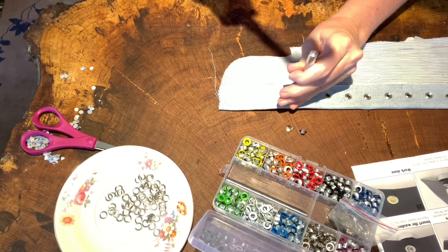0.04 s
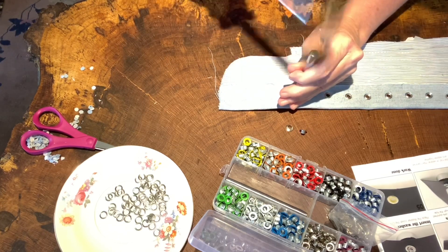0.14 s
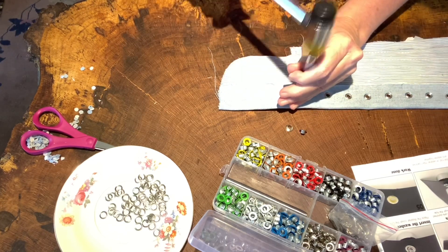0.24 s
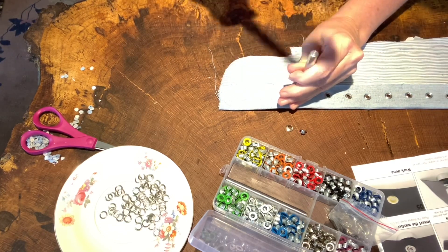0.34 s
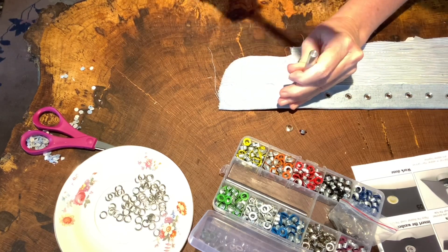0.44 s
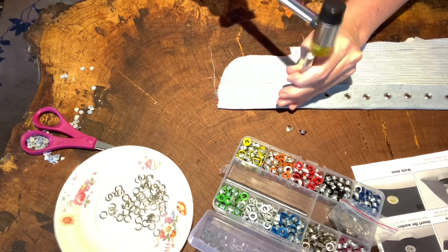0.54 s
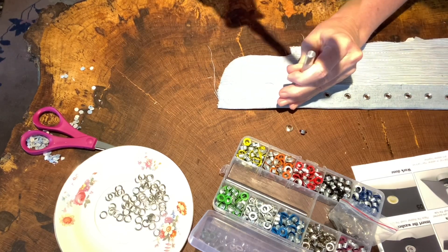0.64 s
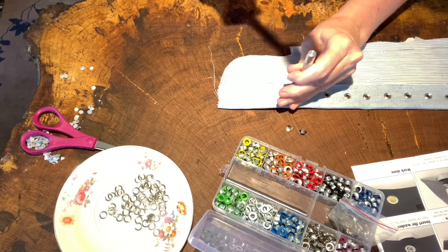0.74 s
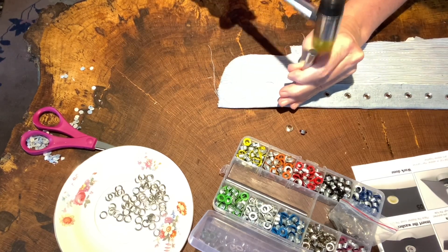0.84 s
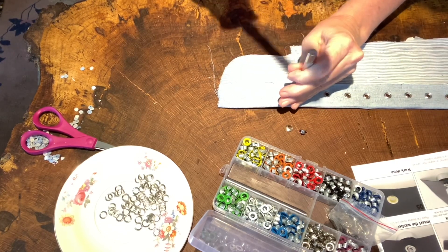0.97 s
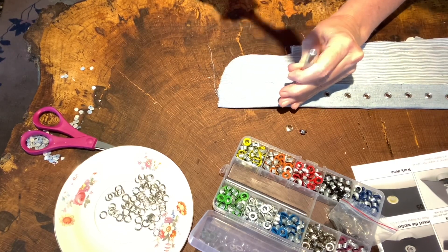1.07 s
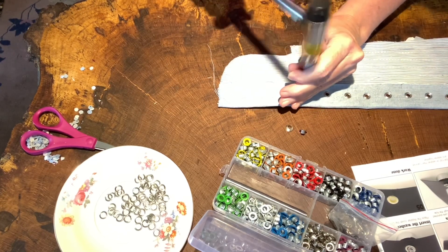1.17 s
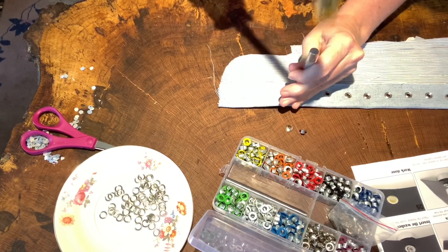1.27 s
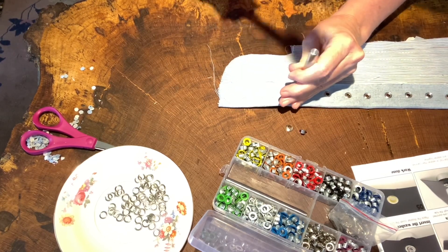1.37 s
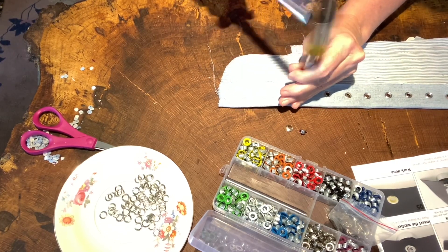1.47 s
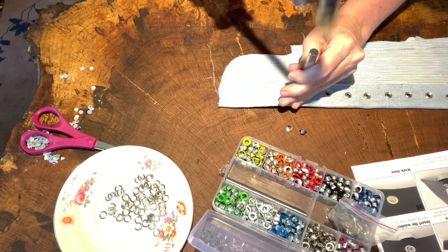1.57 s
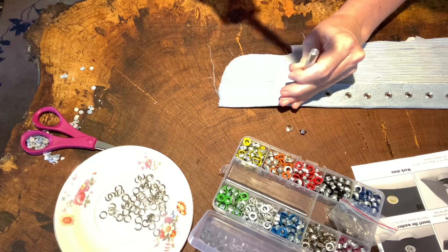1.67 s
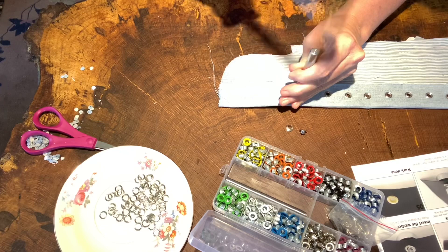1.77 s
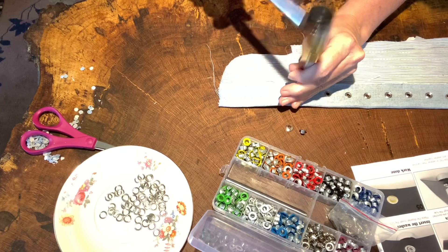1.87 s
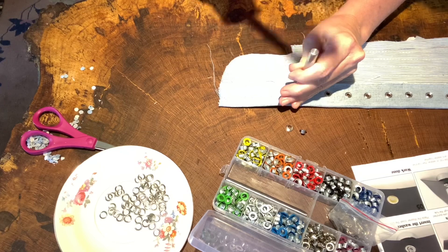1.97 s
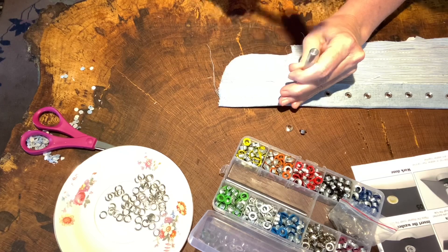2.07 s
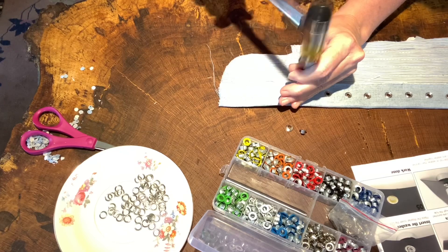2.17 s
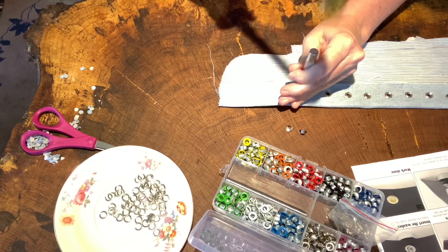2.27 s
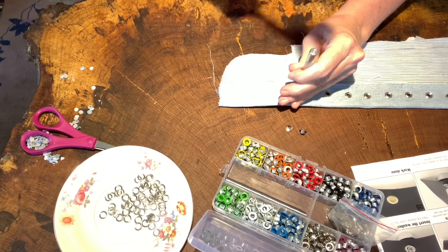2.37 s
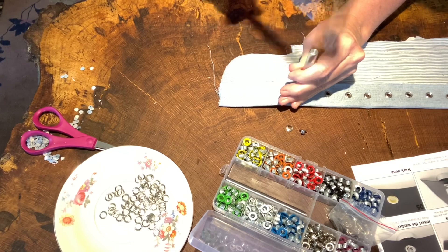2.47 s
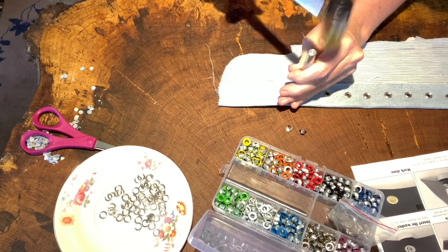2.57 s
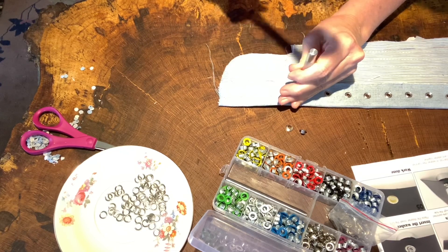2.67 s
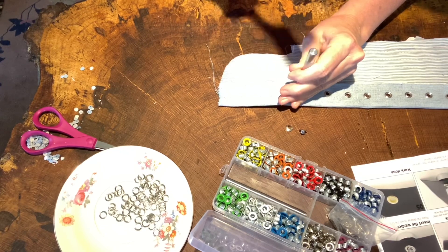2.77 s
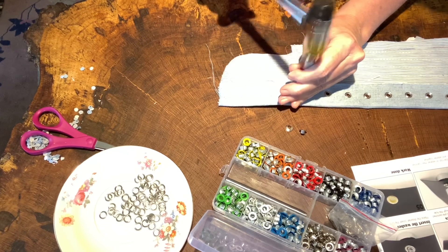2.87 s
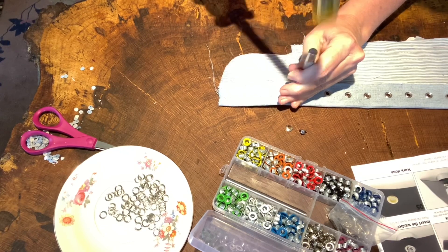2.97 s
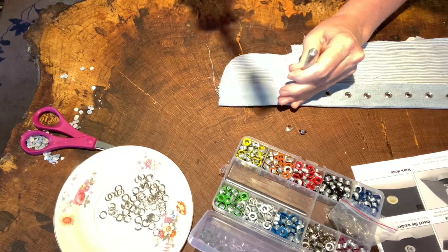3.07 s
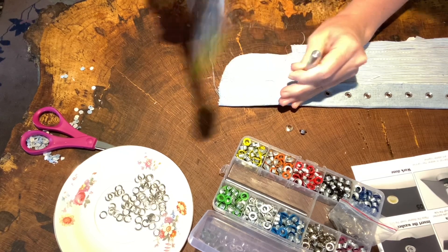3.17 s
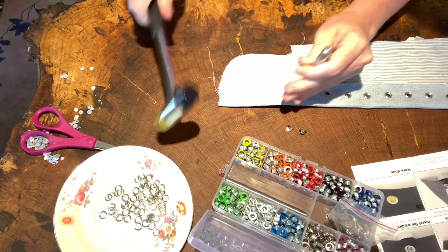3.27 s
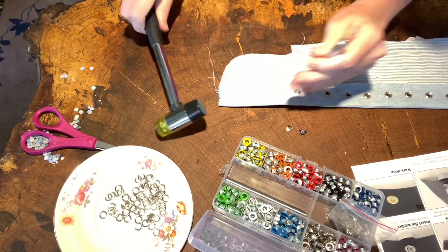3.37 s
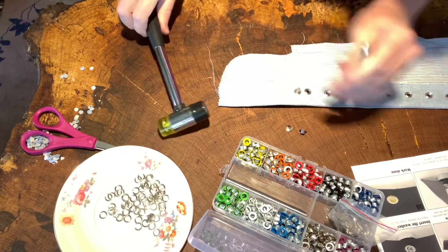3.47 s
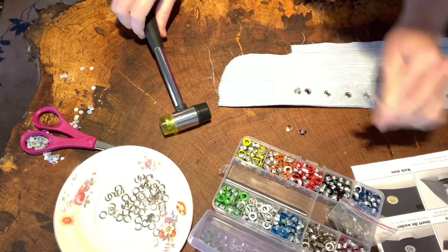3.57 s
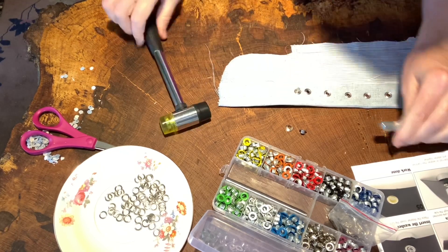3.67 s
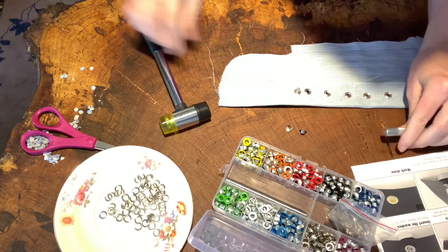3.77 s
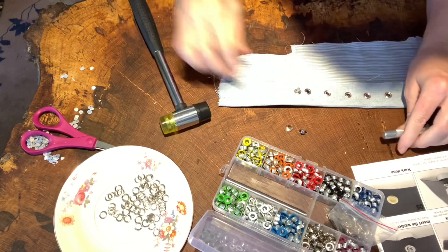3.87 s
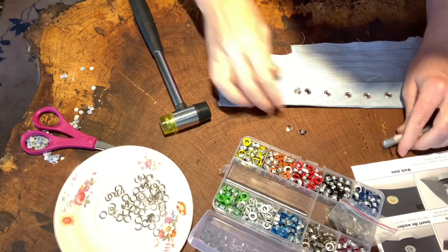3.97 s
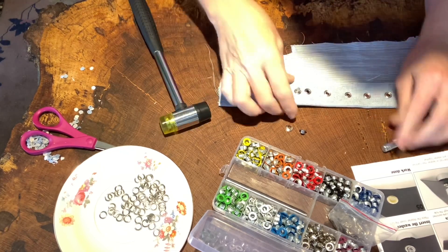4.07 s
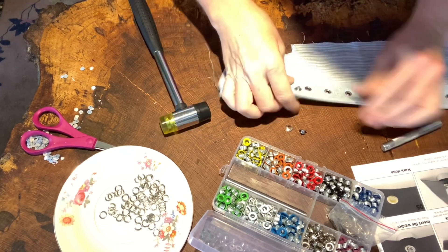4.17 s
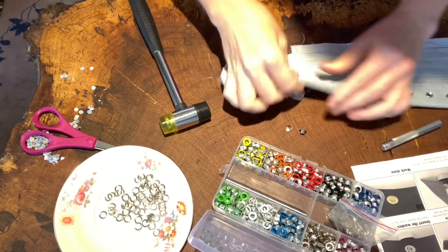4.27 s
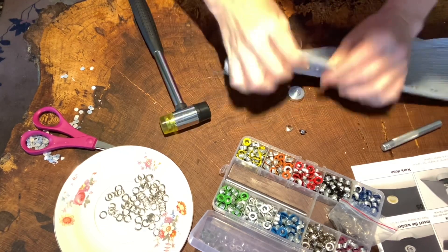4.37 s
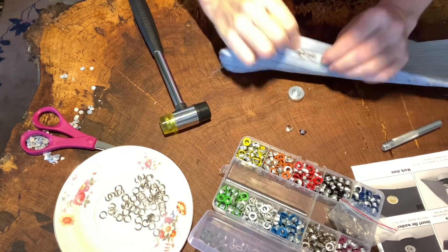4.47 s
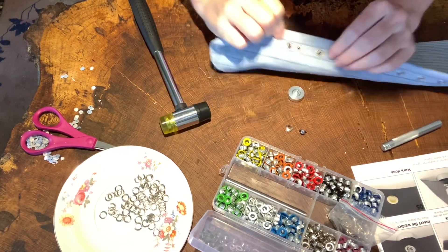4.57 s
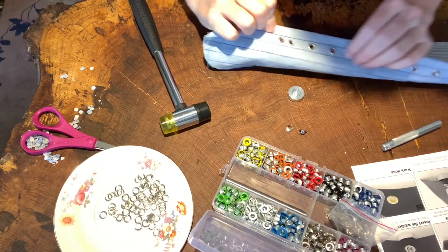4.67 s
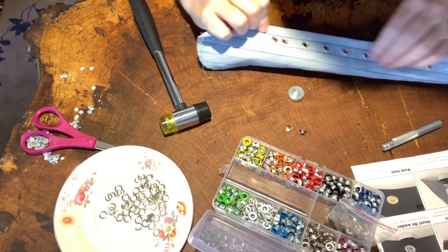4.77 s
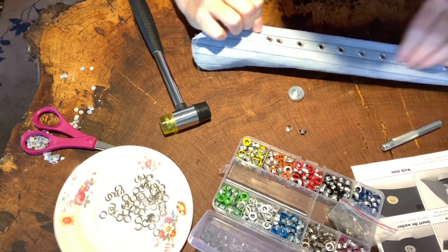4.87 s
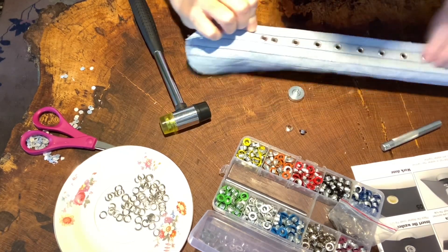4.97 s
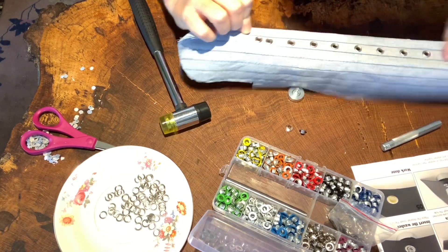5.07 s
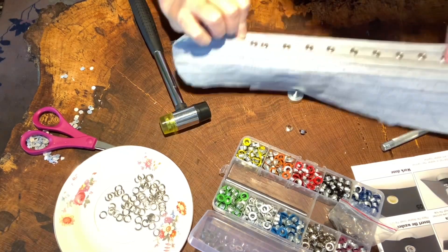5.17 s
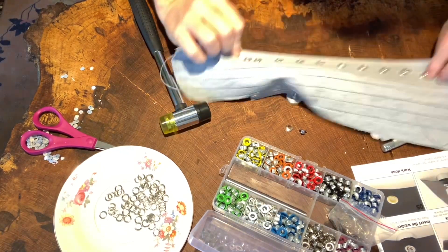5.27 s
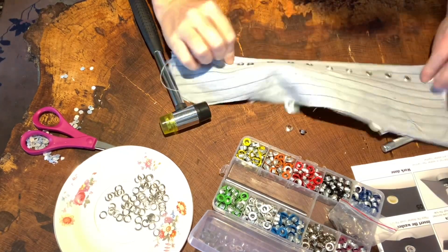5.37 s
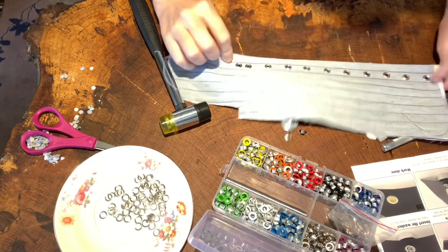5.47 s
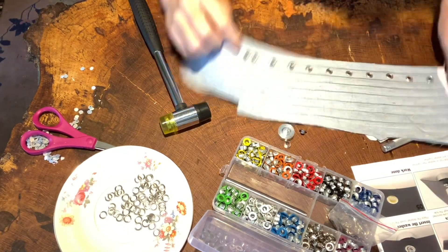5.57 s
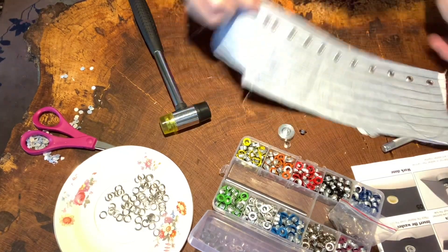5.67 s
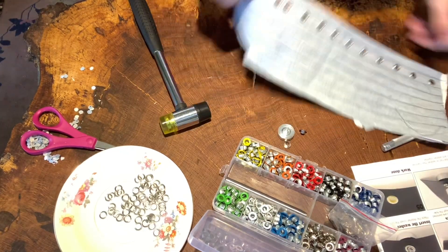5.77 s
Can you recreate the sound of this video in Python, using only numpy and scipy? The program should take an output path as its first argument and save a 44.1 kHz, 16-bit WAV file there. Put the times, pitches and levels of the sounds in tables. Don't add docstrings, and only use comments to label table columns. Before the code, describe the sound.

Nine sharp hammer blows on a steel punch over thick wood, loose eyelets rattling, then tools set down with knocks and a brief metallic ring.

```python
import sys
import numpy as np
from scipy import signal
from scipy.fft import rfft, irfft, next_fast_len
from scipy.io import wavfile
from scipy.ndimage import uniform_filter1d

SR = 44100
rng = np.random.default_rng(int(sys.argv[2]) if len(sys.argv) > 2 else 0)


def output_pcm(signal):
    pcm = np.clip(np.atleast_2d(signal).T, -1, 1) * 32767
    wavfile.write(sys.argv[1], SR, np.round(pcm).astype(np.int16))


def volts_from_decibels(level):
    exponent = np.asarray(level, float) / 20
    return 10 ** exponent


N = 257103
T = np.arange(SR * 3 // 5) / SR
LEAD_S = .0003

# start_s, peak_db, rattle_db, jolt_db (jolt of box lid and dish)
BLOWS = [
    (-.22, -7.5, -13.5, 18.5),
    (0.1192, -1.5, 0, -4.5),
    (0.4582, -2, -2, -2.5),
    (.7820, -5.5, 1, 8.5),
    (1.1199, -4.5, 3.5, -0.5),
    (1.4367, -5.5, 4, 0),
    (1.7602, -4.5, 2.5, -0.6),
    (2.106, -4.5, 5, -3),
    (2.4585, -4.5, 0.5, 2),
    (2.8135, -4.5, 5.5, -4.5),
]
# pitch_hz, level_db, t60_s
TABLE = [(128.6, -5, 0.35), (193.75, -7.5, 0.77), (212.9, -9.5, 1), (254.7, -2, 0.44), (279.6, -5.5, 0.25),
         (355, -11.5, 0.71), (369.5, -2.5, 0.15), (399.5, -4, 0.81), (480, -6.5, 1), (490, 0, 0.43),
         (571.4, -2.5, 0.21), (675, -5, 0.37), (614, -1.5, 0.083), (722, -3.5, 0.56), (806, 1.5, 0.2),
         (854, -13, 0.8), (917, -6, 0.039), (1152.7, 3.5, 0.034), (1225, 0, 0.095), (1410, -15.5, 0.43),
         (1473, -10, 0.022)]
# pitch_hz, level_db, t60_s
LEGS = [(47, -8, .24), (95, -24, .2)]
# pitch_hz, level_db, t60_s
ROOM_MODES = [(203, -34, .75), (256, -24, .8)]
# freq_hz, level_db (per Hz)
FIRST_WAVE = [(150, -44), (350, -6.5), (750, -1), (1000, -6.5), (1280, 0.5), (1800, -3.5), (2200, -9.5),
              (3100, -2), (4300, -15.5), (6400, -10.5), (10000, -23.5), (16000, -30.5)]
# freq_hz, level_db (per Hz)
WOOD_TAIL = [(60, -25.5), (110, -16), (190, -1.5), (300, -4), (450, -1), (700, -6.5), (1000, -11.5),
             (1350, -10.5), (2000, -22.5), (3000, -43.5), (5500, -120)]
# freq_hz, t60_s
DECAY = [(60, 0.44), (250, 0.13), (750, 0.22), (2000, 0.24), (5000, 0.21), (9000, 0.19), (13000, 0.205),
         (16000, 0.18)]
# freq_hz, t60_s
LINGER = [(60, 0.5), (250, 0.9), (500, 0.54), (1500, 0.32), (5000, 0.5), (14000, 0.36)]
# freq_hz, level_db (per Hz)
RATTLE = [(880, -23), (1500, -11), (1780, -13.5), (2300, -10), (3400, -7.5), (4320, -16.5), (5220, -12.5),
          (7260, -8.5), (11800, -21), (15000, -22), (16300, -25.5)]
# freq_hz, level_db (per Hz)
ROOM_TONE = [(25, -10), (48, 6), (70, -0.5), (100, -5), (125, 3), (165, 0.5), (240, -10.5), (400, -8),
             (1000, -13.5), (2000, -19), (4000, -24.5), (8000, -24), (14000, -28.5), (16500, -30.5)]
# start_s, level_db
ROOM_LEVEL = [(0.0, -58.5), (5.83, -64)]
# start_s, length_s, level_db
SCRAPE = [
    (3.165, 0.052, -61),
]
# start_s, level_db
RINGS = [
    (3.185, -77),
    (3.212, -65),
    (3.965, -37),
    (3.989, -16.5),
]
# pitch_hz, level_db, t60_s
STEEL = [(6335, -6, .58), (6348.5, -7, .66), (6640, -17, .05)]
# start_s, peak_db, resonance_hz, click_db
PUNCH_TAPS = [
    (3.212, -47, 1204, -6.5),
    (4.245, -35, 2470, -2),
    (4.280, -33, 1270, -3),
    (4.303, -40, 1350, -5),
]
# start_s, peak_db, resonance_hz, click_db
HEAD_DOWN = [
    (3.388, -47.5, 560, -3),
    (3.533, -27.5, 1250, -7),
]
# start_s, peak_db, resonance_hz, click_db
HANDLE_DOWN = [
    (3.651, -27.5, 428, 0),
]
# start_s, peak_db, resonance_hz, click_db
PUNCH_DOWN = [
    (3.965, -33.5, 1420, -17),
    (3.988, -17, 1570, -6.5),
    (4.041, -22.5, 1500, -21.5),
    (4.074, -28.5, 1260, -16),
    (4.106, -37.5, 1200, -6),
]
# start_s, length_s, level_db
CLOTH = [
    (4.38, .64, -67.5),
    (5.25, .17, -70),
    (5.73, .04, -68),
]
# freq_hz, level_db (per Hz)
WEAVE = [(300, -18.5), (900, -13.5), (2500, -2), (6000, -4), (14000, -4), (16500, -2.5)]
# start_s, peak_db, resonance_hz, click_db
CLOTH_TICKS = [
    (5.05, -62, 503, -28),
    (5.185, -56.5, 555, -17),
    (5.347, -56, 5000, 5),
    (5.419, -48.5, 13000, -10.5),
    (5.466, -51.5, 7000, -24),
    (5.544, -54.5, 553, -14),
]


def unit(x):
    return x / np.sqrt(np.mean(x ** 2) + 1e-20)


def along(points, hz):
    f, v = np.transpose(points)
    return np.interp(np.log(hz + 1), np.log(f + 1), v)


def level(rows):
    return volts_from_decibels(np.interp(np.arange(N) / SR, *np.transpose(rows)))


def filtered(x, response):
    m = next_fast_len(2 * len(x))
    return irfft(rfft(x, m) * response(np.fft.rfftfreq(m, 1 / SR)), m)[:len(x)]


def burst(colour):
    return filtered(rng.standard_normal(len(T)), colour)


def resonances(peaks):
    return lambda f: sum((-1) ** k * volts_from_decibels(db) * 1j * f * width / (hz * hz - f * f + 1j * f * width)
                         for k, (hz, width, db) in enumerate(peaks))


def dispersion(spread_s):
    turn = 4 * np.pi * spread_s * np.sqrt(1000)
    return lambda f: np.exp(-1j * turn * (np.sqrt(f) - f / np.sqrt(2 * SR)))


def add(track, s, sound):
    start = round(s * SR)
    sound = sound[max(-start, 0):]
    part = track[max(start, 0):][:len(sound)]
    part += sound[:len(part)]


def scatter(colour, linger_db):
    hz, t, z = signal.stft(rng.standard_normal(len(T)), SR, nperseg=256)
    early = volts_from_decibels(-60 * t / along(DECAY, hz)[:, None])
    late = volts_from_decibels(linger_db - 60 * t / along(LINGER, hz)[:, None])
    tail = filtered(signal.istft(z * (early + late), SR, nperseg=256)[1][:len(T)], colour)
    return tail / np.sqrt(np.mean(tail[:SR // 25] ** 2))


def ringing(modes, phases, rise_cycles):
    out = 0
    for (hz, db, t60), phase in zip(modes, phases):
        envelope = volts_from_decibels(db - 60 * T / t60) * (1 - np.exp(-T * hz / rise_cycles))
        out = out + envelope * np.sin(2 * np.pi * hz * T + phase)
    return out


def patchy(spectrum, patchy_db):
    z = signal.stft(rng.standard_normal(N), nperseg=512)[2]
    field = uniform_filter1d(uniform_filter1d(rng.standard_normal(z.shape), 8, 0), 14, 1)
    noise = signal.istft(z * volts_from_decibels(patchy_db * unit(field)), nperseg=512)[1][:N]
    return unit(filtered(noise, lambda f: volts_from_decibels(along(spectrum, f))))


def strokes(rows, rise_s, fall_s):
    t, gain = np.arange(N) / SR, 0
    for s, length, db in rows:
        rise_db = 20 * np.minimum((t - s) / rise_s - 1, 0)
        fall_db = 20 * np.maximum(t - s - rise_s - length, 0) / fall_s
        gain = gain + volts_from_decibels(db + rise_db - fall_db)
    return gain


def room_tone():
    return level(ROOM_LEVEL) * patchy(ROOM_TONE, patchy_db=1.2)


def bending_wave(spread_s):
    wave = filtered(1.0 * (T == 0), lambda f: volts_from_decibels(along(FIRST_WAVE, f)) * dispersion(spread_s)(f))
    return wave / abs(wave).max()


def hammer_blows():
    out = np.zeros(N)
    first = bending_wave(spread_s=.0026)
    edge = filtered(first, lambda f: 1 / (1 + (f / 1700) ** 3))
    wave = first + 1.1 * np.roll(edge, round(.0029 * SR))
    phases = rng.uniform(0, 2 * np.pi, len(TABLE))
    colour = lambda f: volts_from_decibels(along(WOOD_TAIL, f))
    swell = 1 - np.exp(-T / 0.0055)
    wood = swell * scatter(colour, linger_db=-28)
    slow_modes = LEGS + ROOM_MODES
    slow = ringing(slow_modes, np.zeros(len(slow_modes)), rise_cycles=0.86)
    for k, (s, db, rattle_db, jolt_db) in enumerate(BLOWS):
        crack = volts_from_decibels(-8.5 - 60 * T / 0.0083) * burst(lambda f: f / (f + 2500))
        modes = [(hz, d + rng.normal(0, 2), min(t60, .2 + 25 / hz)) for hz, d, t60 in TABLE]
        shifted = .85 * wood + .75 * swell * scatter(colour, linger_db=-28)
        thud = volts_from_decibels(-11.5) * (ringing(modes, phases, rise_cycles=0.17) + slow)
        thud = thud + volts_from_decibels(-8.5) * filtered(shifted, dispersion(0.003997))
        shaken = [(1400, 0), (2200, 1.1 * jolt_db), (3000, 0), (4200, .9 * jolt_db), (6000, 0)]
        loose = scatter(lambda f: volts_from_decibels(along(RATTLE, f) + along(shaken, f)), linger_db=-29.5)
        rattle = volts_from_decibels(rattle_db - 16.5) * swell * loose
        sharp = volts_from_decibels(db) * (filtered(wave, lambda f: volts_from_decibels(along(shaken, f))) + crack + rattle)
        thud_db = -5 + 0.23 * k
        add(out, s - LEAD_S, sharp + volts_from_decibels(thud_db) * thud)
    return out


def eyelets_landing():
    flight_s, landing_db, landing_hz = .026, -23.5, 2980
    out = np.zeros(N)
    variations = rng.standard_normal((len(BLOWS), 3))
    for (s, db, rattle_db, jolt_db), (late, tune, size) in zip(BLOWS, variations):
        hz = landing_hz * volts_from_decibels(.6 * tune - 0.24 * jolt_db)
        grit = volts_from_decibels(5 * rng.standard_normal(len(T))) * rng.standard_normal(len(T))
        envelope = (T / 0.0044) * np.exp(1 - T / 0.0043)
        patch = unit(filtered(grit, resonances([(hz, 0.18 * hz, 0)]))) * envelope
        add(out, s + flight_s - .005 + .003 * late, volts_from_decibels(db + landing_db + 1.5 * size) * patch)
    return out


def punch_scrape():
    grit = volts_from_decibels(3.5 * rng.standard_normal(N)) * rng.standard_normal(N)
    rub = unit(filtered(grit, resonances([(4070, 1100, 0.0079), (6600, 850, 0.024)])))
    return strokes(SCRAPE, rise_s=0.0041, fall_s=.03) * rub


def punch_ring():
    out = np.zeros(N)
    ring = ringing(STEEL, [0, -.45, 0], rise_cycles=6) * volts_from_decibels(-500 * T ** 2)
    for s, db in RINGS:
        add(out, s - LEAD_S, volts_from_decibels(db + 3.5) * ring)
    return out


def contacts(events, knock_s, table_db, hard_hz, upper_hz, ring_db, wet_db):
    out = np.zeros(N)
    for s, db, low_hz, click_db in events:
        high_hz = low_hz + upper_hz
        room_db = wet_db - 0.16 * (db + 48.5)
        body = resonances([(low_hz, .25 * low_hz, 0), (high_hz, .45 * high_hz, -1.5)])
        sheen_hz = hard_hz * volts_from_decibels(0.2 * click_db)
        sheen = lambda f: (f / (f + 1200)) / (1 + (f / sheen_hz) ** 3)
        colour = lambda f: body(f) / (1 + (f / high_hz / 2.1) ** 3) + volts_from_decibels(click_db - 0.5) * sheen(f)
        near = [(hz, d + rng.normal(0, 3) - 2 * abs(np.log2(hz / low_hz)), min(t60, .08 + 30 / hz))
                for hz, d, t60 in TABLE]
        table = ringing(near, rng.uniform(0, 2 * np.pi, len(near)), rise_cycles=0.54)
        table = table + volts_from_decibels(4.5) * ringing(ROOM_MODES, [0, 0], rise_cycles=1.8)
        table = table + volts_from_decibels(-4.5) * ringing(LEGS, [0, 0], rise_cycles=0.9)
        knock = volts_from_decibels(-60 * T / knock_s) * rng.standard_normal(len(T))
        knock = filtered(knock, lambda f: colour(f) * dispersion(.002)(f))
        ring = ringing([(low_hz, ring_db, 16 / low_hz)], [0], rise_cycles=1)
        click = volts_from_decibels(click_db - 60 * T / .007) * burst(sheen)
        tail = scatter(lambda f: abs(colour(f)), linger_db=-28) * (1 - np.exp(-T / 0.007))
        room = volts_from_decibels(room_db - 16) * (tail + volts_from_decibels(table_db) * table)
        add(out, s - LEAD_S, volts_from_decibels(db + 0.5) * (knock / abs(knock).max() + ring + click + room))
    return out


def punch_taps():
    return contacts(PUNCH_TAPS, knock_s=0.032, table_db=1.5, hard_hz=7200, upper_hz=1780,
                    ring_db=-17, wet_db=0)


def hammer_head():
    return contacts(HEAD_DOWN, knock_s=0.021, table_db=8, hard_hz=5000, upper_hz=1090,
                    ring_db=5, wet_db=0)


def bounced(events, count):
    first_s, shrink, loss_db = .0455, .6, 4.6
    s, db, *colour = events[-1]
    return events + [(s + first_s * (1 - shrink ** k) / (1 - shrink), db - loss_db * k, *colour)
                     for k in range(1, count + 1)]


def hammer_handle():
    return contacts(bounced(HANDLE_DOWN, count=2), knock_s=0.016, table_db=12, hard_hz=3350,
                    upper_hz=2080, ring_db=5.5, wet_db=-4)


def punch_drop():
    return contacts(PUNCH_DOWN, knock_s=0.03, table_db=0, hard_hz=8910, upper_hz=2300,
                    ring_db=-19.5, wet_db=1.5)


def cloth():
    return strokes(CLOTH, rise_s=0.0863, fall_s=0.45) * patchy(WEAVE, patchy_db=.8)


def cloth_ticks():
    return contacts(CLOTH_TICKS, knock_s=0.022, table_db=1.5, hard_hz=13900, upper_hz=900,
                    ring_db=4, wet_db=-1)


def scene():
    driving = room_tone() + hammer_blows() + eyelets_landing()
    punch = punch_scrape() + punch_ring() + punch_taps() + punch_drop()
    laid_down = hammer_head() + hammer_handle()
    return (driving + punch + laid_down + cloth() + cloth_ticks())[None]


def gain_duck():
    duck_db = np.zeros(N)
    for s, *_ in BLOWS:
        add(duck_db, s + .005, -8 * (1 - np.exp(-T / 0.000044)) * np.exp(-(T / 0.052) ** 0.8))
    return volts_from_decibels(duck_db)


def smear_ahead():
    out = np.zeros(N)
    t = T[:round(.021 * SR)]
    early = volts_from_decibels(-48 - 60 * t / .03) * (1 - np.exp(-t / .002))
    late = volts_from_decibels(-38 - 60 * t[::-1] / .035) * (t > .011)
    dull = lambda f: 1 / (f + 700) / (1 + (f / 6000) ** 4)
    for s, *_ in BLOWS:
        add(out, s - .0215, (early + late) * unit(filtered(rng.standard_normal(len(t)), dull)))
    return volts_from_decibels(4) * out


def band_limit(x):
    return signal.sosfilt(signal.butter(12, 17000, fs=SR, output="sos"), x)


def record(dry):
    x = dry[0] * gain_duck() + smear_ahead()
    x = x / (1 + abs(x / 1.05) ** 4) ** (1 / 4)
    x = filtered(x, lambda f: 1 / (1 + (f / 16000) ** 80) * (1j * f / (1j * f + 38)) ** 3)
    return band_limit(x[None])


dry = scene()
out = record(dry)
output_pcm(out)
```